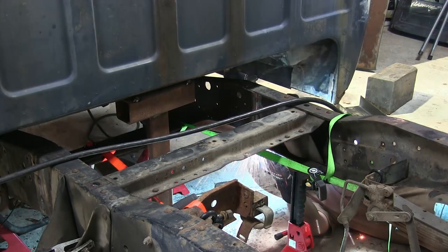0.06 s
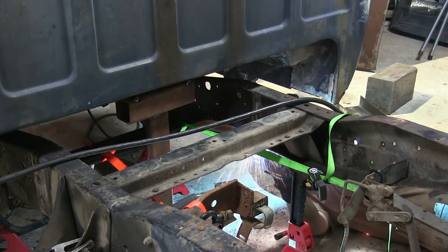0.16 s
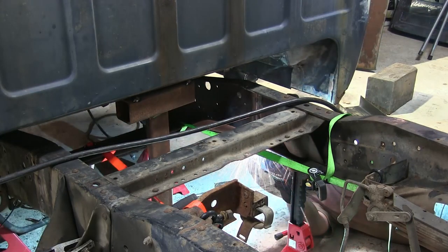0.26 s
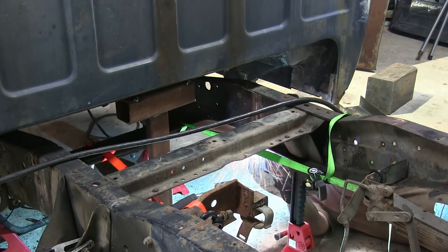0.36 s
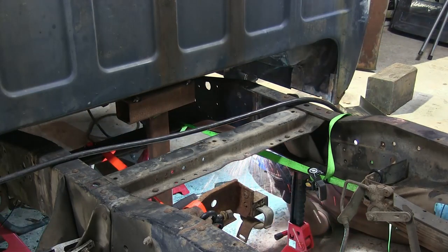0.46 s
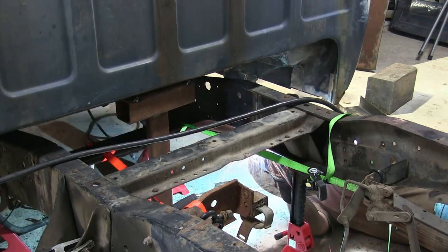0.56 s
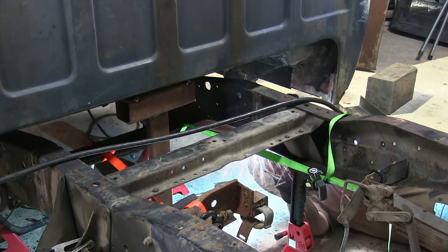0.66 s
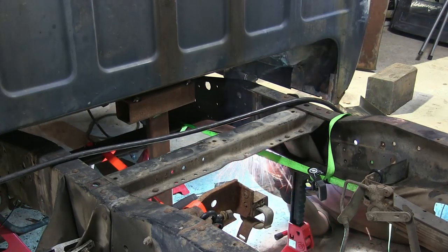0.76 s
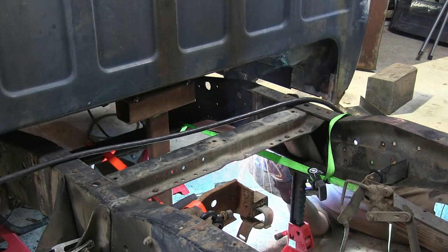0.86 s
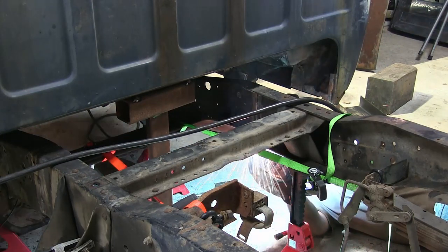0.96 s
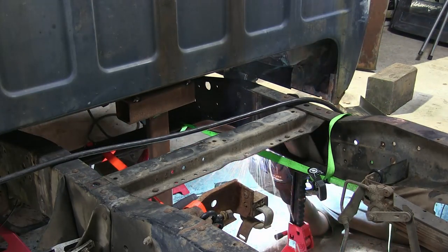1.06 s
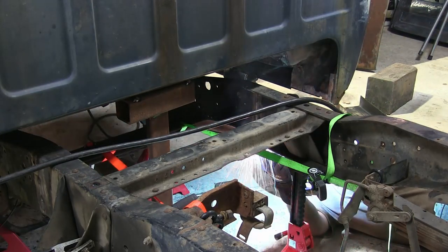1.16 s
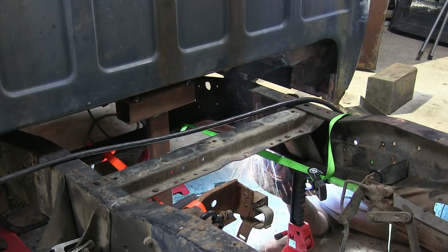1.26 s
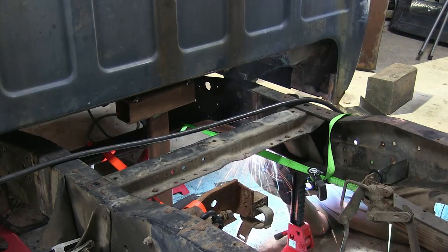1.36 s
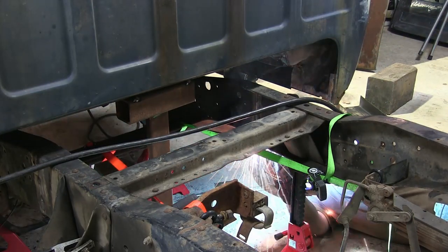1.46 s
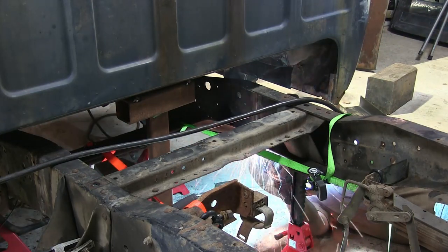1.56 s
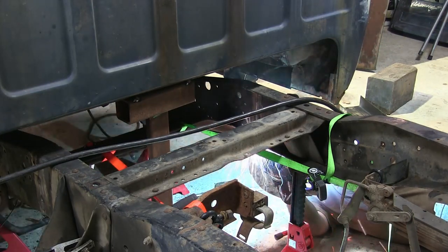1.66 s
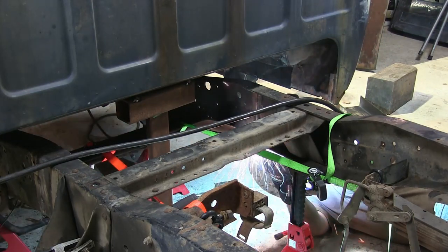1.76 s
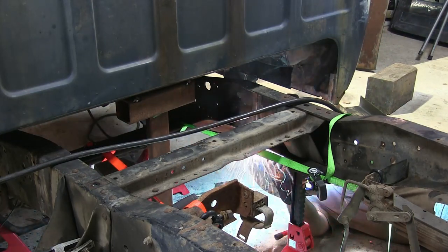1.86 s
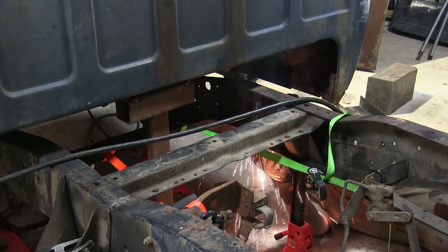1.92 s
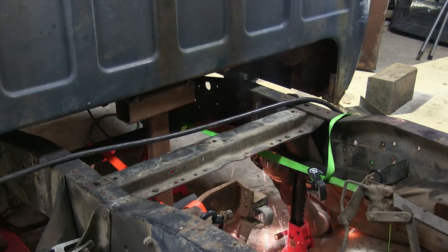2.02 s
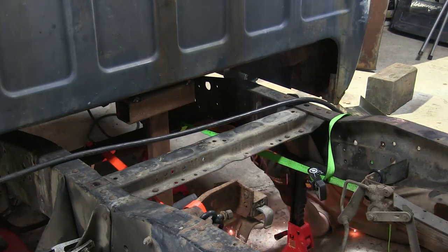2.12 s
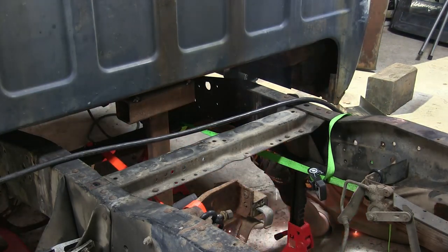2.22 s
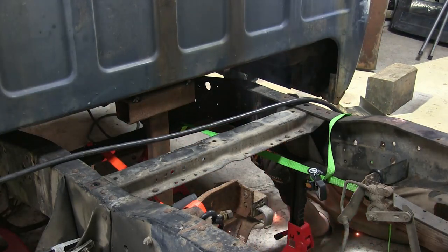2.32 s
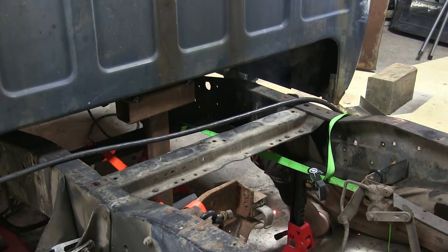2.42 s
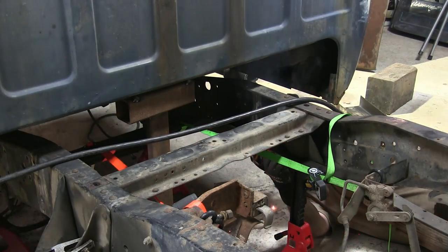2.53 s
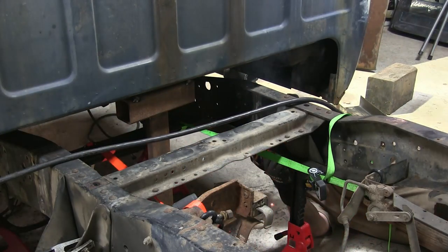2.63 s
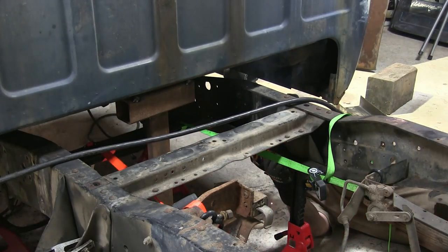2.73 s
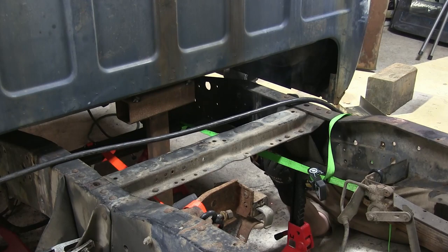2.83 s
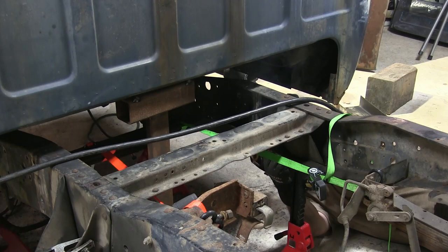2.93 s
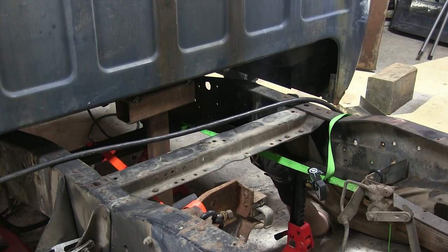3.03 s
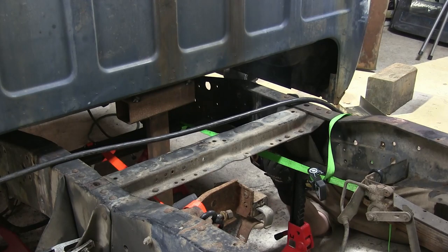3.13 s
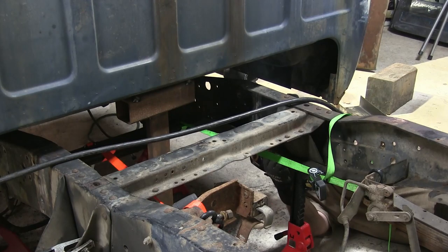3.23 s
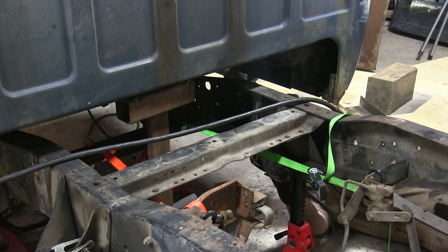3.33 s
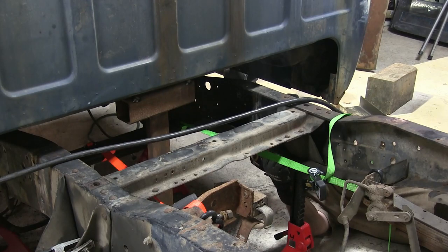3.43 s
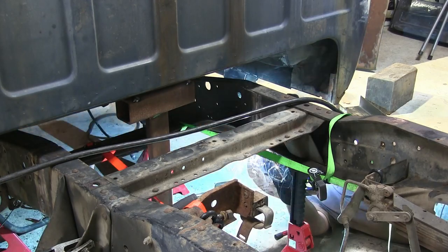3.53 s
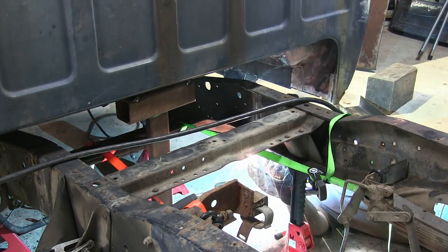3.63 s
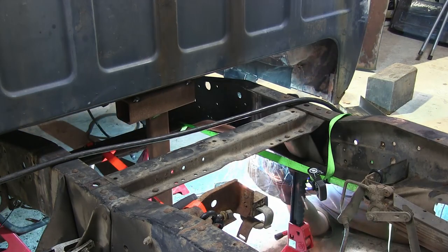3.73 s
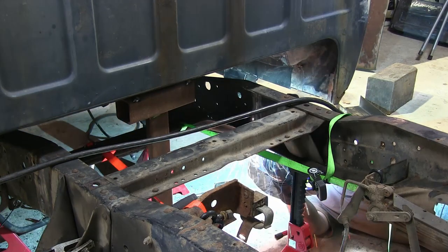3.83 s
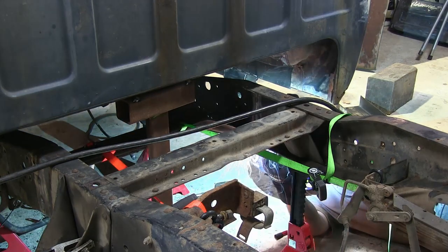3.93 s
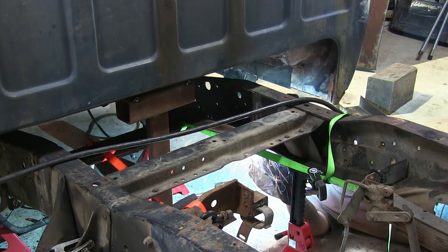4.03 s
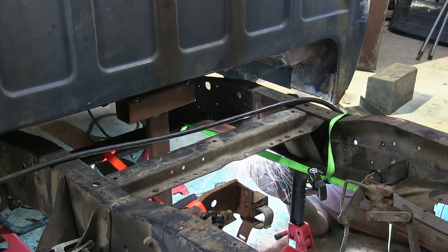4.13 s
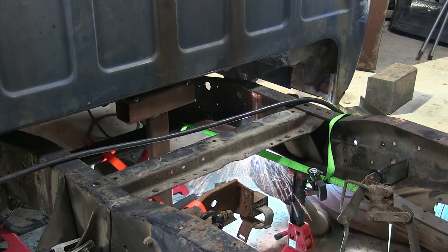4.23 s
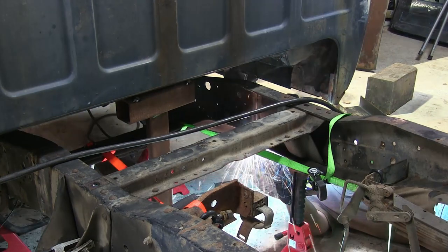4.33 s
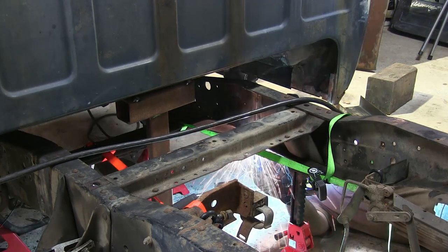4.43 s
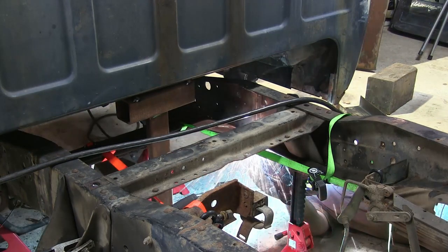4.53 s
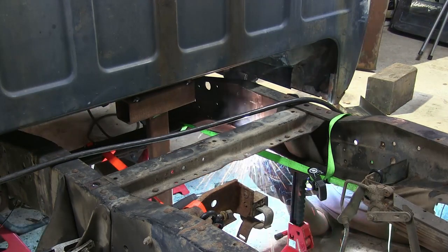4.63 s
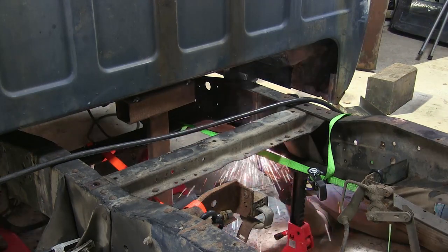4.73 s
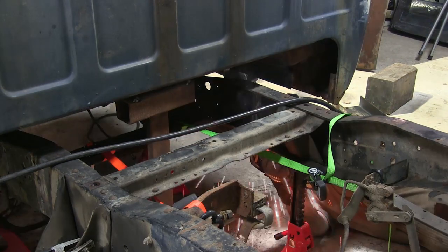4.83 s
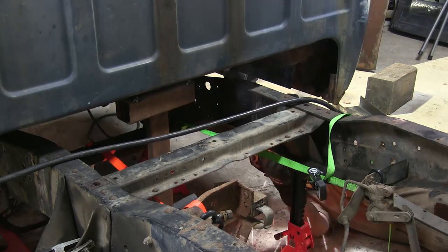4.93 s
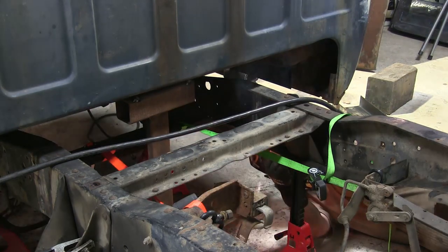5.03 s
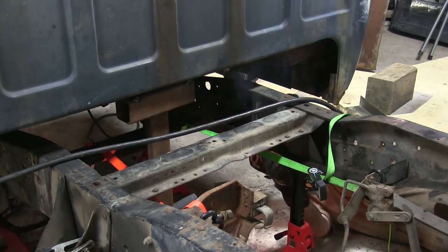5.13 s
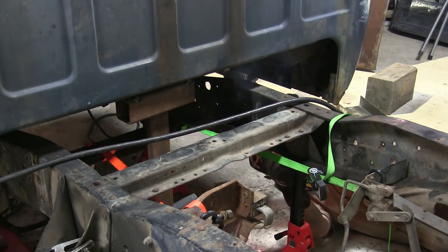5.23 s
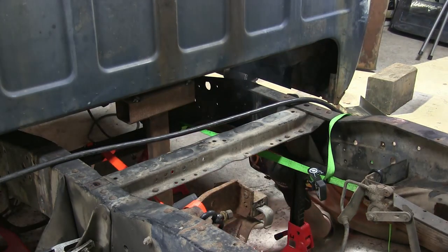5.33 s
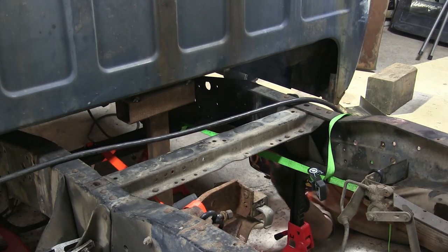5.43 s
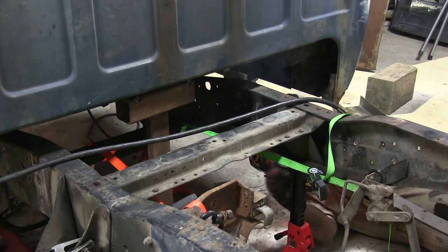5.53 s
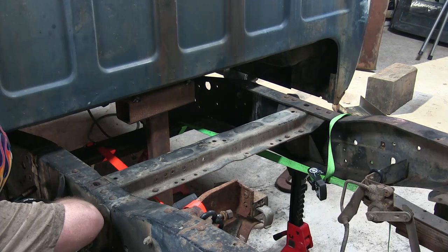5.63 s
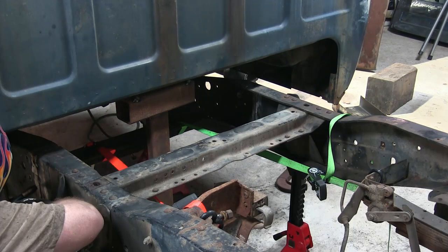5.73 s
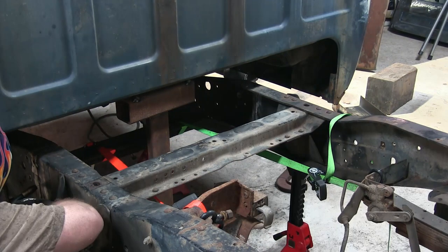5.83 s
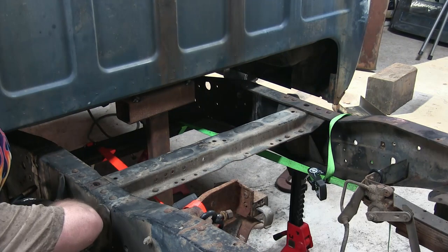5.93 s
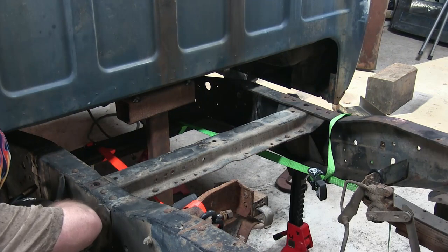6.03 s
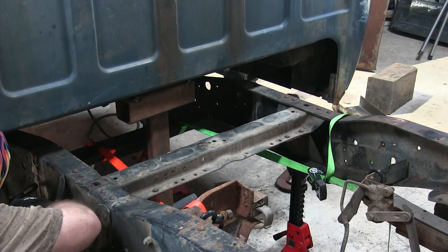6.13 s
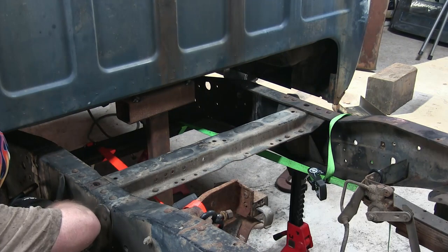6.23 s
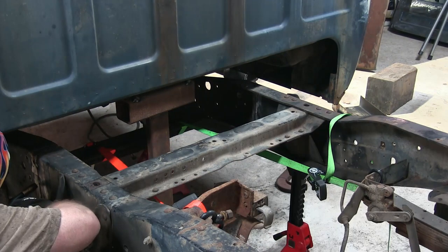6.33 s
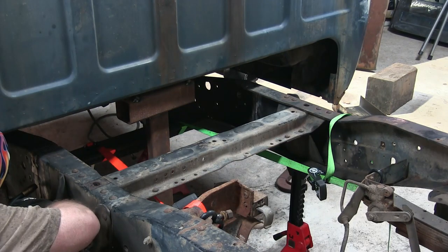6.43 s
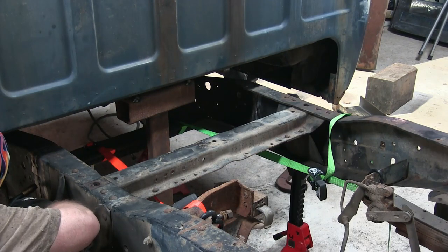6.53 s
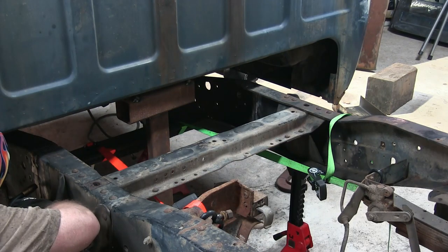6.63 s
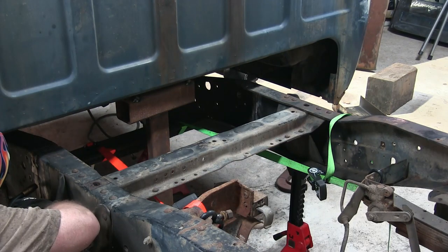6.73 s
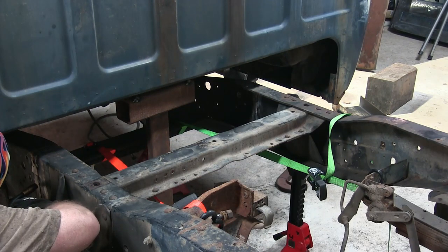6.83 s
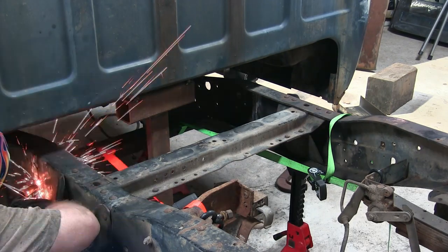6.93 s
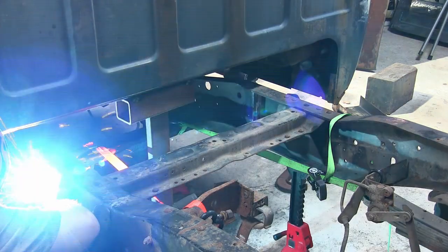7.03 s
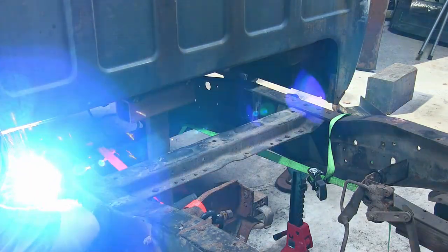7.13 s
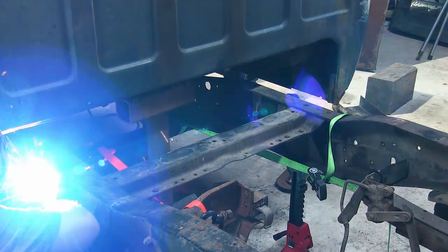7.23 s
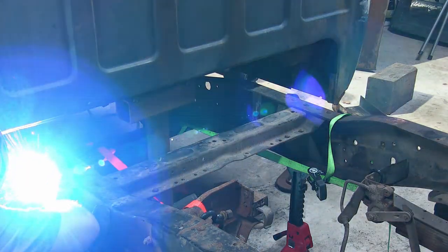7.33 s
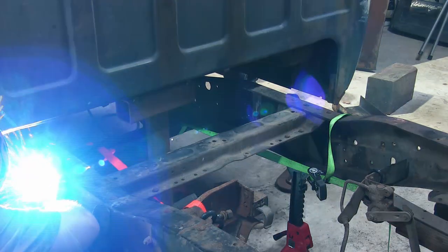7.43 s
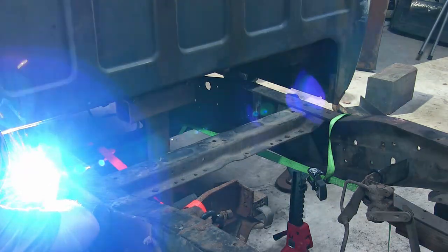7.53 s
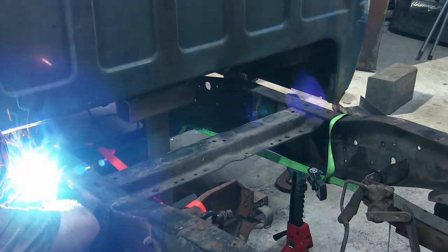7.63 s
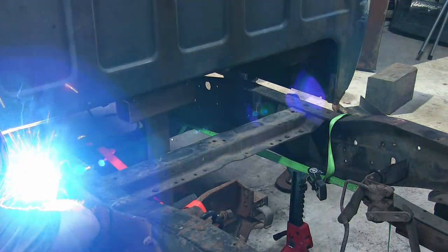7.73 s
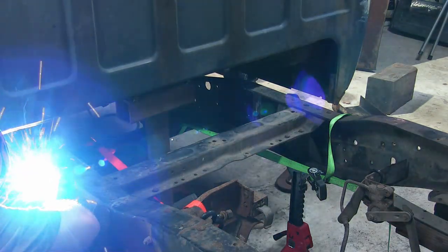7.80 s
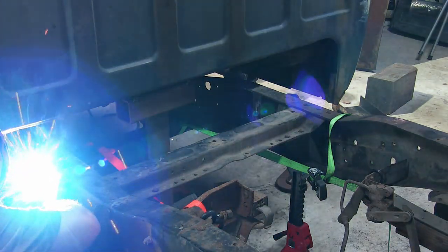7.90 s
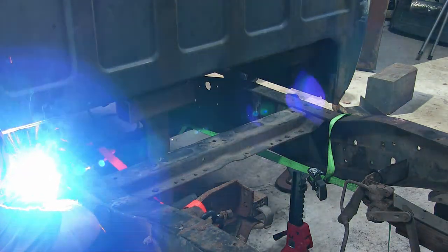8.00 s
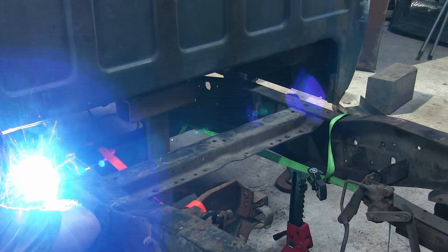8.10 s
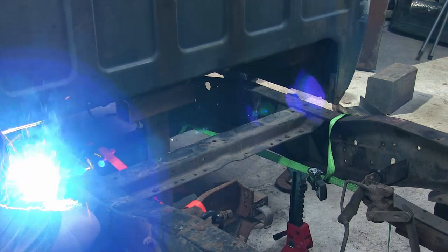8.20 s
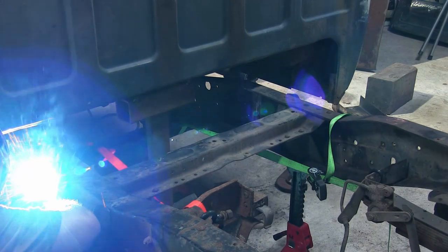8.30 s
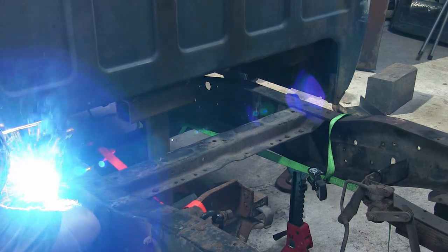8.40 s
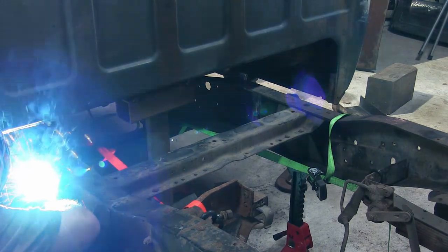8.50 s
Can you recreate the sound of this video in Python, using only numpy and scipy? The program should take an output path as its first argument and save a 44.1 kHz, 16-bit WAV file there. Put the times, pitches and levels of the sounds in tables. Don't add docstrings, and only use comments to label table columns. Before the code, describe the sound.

A garage with hard reflections, heard by a stationary camera microphone with automatic gain. From the first instant to about 2.0 s, a wire-feed welder under a steel frame crackles: rapid, irregular sharp pops, about dozens a second, over bright sizzling fizz, flaring and faltering, with metallic ring and brief faint whistles. It cuts off into a short room tail, and a low fan hum near 210 Hz with soft rushing air swells back. At 3.56 s a tiny tick and touch, then a hard snap at 3.6 s starts a second sputtering run to 4.84 s. Hum recovers; at 5.63 s it abruptly jumps louder after a momentary dip. At 6.92 s a tick and a wire snap, then at 6.98 s a nearer third run catches, stutters and burns with dense, tighter crackling until the end at about 8.6 s, the hum pushed far down beneath it.

```python
import sys
import numpy as np
from scipy import signal
from scipy.fft import rfft, irfft, next_fast_len
from scipy.io import wavfile
from scipy.ndimage import uniform_filter1d, map_coordinates

SR = 44100
rng = np.random.default_rng(int(sys.argv[2]) if len(sys.argv) > 2 else 0)


def master_out(mix):
    frames = np.transpose(np.atleast_2d(mix))
    ceiling = np.clip(frames, -1, 1)
    pcm = np.round(ceiling * 32767).astype(np.int16)
    wavfile.write(sys.argv[1], SR, pcm)


def boost_factor(decibels):
    exponent = np.asarray(decibels, float) / 20
    return 10 ** exponent


N = 377496
T = np.arange(N) / SR
MOVED_S = 5.632

# time in seconds, camera gain in dB (the fan tone's level),
# level of the arc's body in dB.
ARC_RUNS = [
    [(0.0, -46.5, -10.5), (0.27, -54.5, -4), (0.43, -49.5, -11), (0.55, -52, -7), (0.85, -47, -10.5),
     (1.17, -55, -28), (1.35, -52.5, -13.5), (1.75, -49, -14.5), (1.99, -50, -17)],
    [(3.592, -45, -41), (3.68, -52, -8), (3.85, -49.5, -9.5), (4.15, -52, -4.5), (4.4, -52, -8.5),
     (4.49, -53, -9.5), (4.62, -49, -18.5), (4.76, -50, -15), (4.84, -51, -17)],
    [(6.984, -47.5, -18), (7.07, -57.5, -50), (7.13, -59, -15), (7.4, -54, -11.5), (7.7, -57, -13),
     (7.88, -58, -13), (8.07, -61.5, -2.5), (8.3, -62, -6), (8.56, -56, -7)],
]
RUN_POWER_DB = [15.5, 14.5, 19.5]
# start in seconds, level change in dB, fall time in seconds.
FLARES = [(0, 0, 0.028), (0.143, 5, 0.066), (0.377, 2, 0.081), (0.603, 0.5, 0.043), (0.886, 3.5, 0.052),
          (1.056, 6, 0.026), (1.153, 1, .04), (1.228, 10, 0.035), (1.794, -2, 0.038), (1.94, 4, 0.014),
          (4.429, 12, 0.024), (4.815, -0.5, .05), (7.107, 13, 0.015), (7.183, 6, 0.017), (7.82, 5, 0.12)]
# start in seconds, level change in dB, fall time in seconds.
CATCHING = [
    (3.592, 7, .016),
    (3.612, -12, .03),
    (3.645, 11, .028),
    (3.69, -3, .03),
    (6.984, -10, .11),
    (6.985, 8, .018),
    (7.015, -4, .03),
    (7.05, 2, .04),
]
FLARE_RISE_S = .005
# start in seconds, length in seconds, level in dB,
# time in seconds at which the camera gain falls, gain it falls to in dB.
TOUCHES = [
    (3.568, .018, -45, 3.573, -45),
    (6.928, .026, -41.5, 6.955, -39.5),
]
TOUCH_BODY_DB = 5.5

# time in seconds, peak in dB.
FIRST_POPS = [(0.0188, -24), (0.062, -22), (0.1032, -25), (0.1372, -24), (0.1478, -22), (0.1785, -25),
              (0.2038, -25), (0.2871, -25), (0.3561, -22), (0.3707, -25), (0.3836, -22), (0.3948, -24),
              (0.4131, -23), (0.4391, -23), (0.5628, -25), (0.6047, -24), (0.618, -23), (0.6402, -22),
              (0.6801, -24), (0.7051, -22), (0.7514, -23), (0.7644, -23), (0.829, -24), (0.8891, -23),
              (0.8995, -24), (0.9185, -23), (0.9324, -22), (0.947, -22), (0.9589, -25), (0.9717, -23),
              (0.9872, -23), (1.0351, -25), (1.0561, -21), (1.0789, -25), (1.1059, -26), (1.1324, -27),
              (1.1454, -27), (1.232, -22), (1.2485, -22), (1.4111, -25), (1.433, -25), (1.4985, -26),
              (1.5455, -25), (1.5622, -26), (1.6704, -21), (1.7148, -22), (1.7219, -22), (1.7313, -23),
              (1.7384, -24), (1.7463, -23), (1.756, -23), (1.7632, -24), (1.7929, -25), (1.7971, -23),
              (1.8061, -23), (1.8239, -21), (1.8334, -23), (1.9047, -25), (1.9554, -25), (1.9649, -22)]
# time in seconds, peak in dB.
SECOND_POPS = [(3.5942, -20), (3.6466, -20), (3.6755, -26), (3.7314, -27), (3.7648, -26), (3.814, -22),
               (3.8332, -25), (3.8564, -27), (3.8843, -26), (3.9171, -25), (3.9319, -25), (3.9477, -24),
               (3.9565, -26), (3.9665, -25), (3.983, -24), (4.022, -25), (4.0316, -26), (4.0889, -24),
               (4.1729, -26), (4.1944, -24), (4.2096, -25), (4.2314, -24), (4.2401, -26), (4.2625, -24),
               (4.2889, -27), (4.3152, -26), (4.3285, -24), (4.3465, -25), (4.3522, -23), (4.3782, -21),
               (4.4302, -21), (4.5287, -25), (4.5392, -27), (4.5646, -27), (4.5964, -25), (4.63, -24),
               (4.6415, -26), (4.6894, -25), (4.6981, -26), (4.7024, -24), (4.7228, -23), (4.7417, -23),
               (4.7628, -25), (4.7713, -27), (4.7955, -25)]
# time in seconds, peak in dB.
THIRD_POPS = [(6.9858, -22), (7.0465, -24), (7.0671, -25), (7.0908, -25), (7.0996, -25), (7.1412, -26),
              (7.1522, -23), (7.16, -27), (7.2008, -28), (7.2093, -27), (7.2497, -25), (7.278, -27),
              (7.2995, -27), (7.334, -26), (7.3946, -26), (7.4094, -27), (7.4199, -27), (7.4314, -24),
              (7.4528, -27), (7.5086, -26), (7.5824, -25), (7.5907, -27), (7.6, -29), (7.6154, -25),
              (7.6254, -26), (7.6523, -25), (7.7108, -25), (7.7461, -29), (7.7938, -27), (7.8051, -26),
              (7.8281, -28), (7.8352, -29), (7.8591, -26), (7.8707, -26), (7.918, -25), (7.9544, -29),
              (8.0167, -26), (8.0355, -27), (8.1032, -29), (8.1437, -29), (8.1593, -28), (8.1674, -29),
              (8.1842, -29), (8.1927, -28), (8.2035, -27), (8.2178, -26), (8.2324, -27), (8.2801, -28),
              (8.2883, -29), (8.2967, -24), (8.3071, -26), (8.3158, -24), (8.3576, -29), (8.3687, -29),
              (8.4153, -28), (8.4256, -29), (8.4325, -27), (8.4522, -27), (8.4617, -27), (8.5086, -29)]
# time in seconds, peak in dB.
LESSER_FAR_POPS = [(0.0034, -25), (0.0115, -26), (0.0947, -24), (0.2422, -25), (0.3034, -28), (0.3208, -26),
                   (0.4263, -23), (0.4677, -25), (0.581, -23), (0.6463, -22), (0.7162, -25), (0.8005, -23),
                   (0.8162, -26), (0.8766, -22), (0.9776, -25), (1.0187, -26), (1.0317, -27), (1.0919, -27),
                   (1.1676, -29), (1.2032, -28), (1.3106, -29), (1.326, -31), (1.3547, -29), (1.4225, -26),
                   (1.5256, -27), (1.5585, -26), (1.6293, -24), (1.7885, -24), (1.8928, -27), (3.8229, -25),
                   (3.8924, -26), (3.9399, -25), (4.114, -25), (4.3899, -28), (4.4717, -27), (4.5829, -27),
                   (4.8047, -27), (4.8189, -28)]
# time in seconds, peak in dB.
LESSER_NEAR_POPS = [(7.0587, -25), (7.0632, -26), (7.0951, -29), (7.1768, -28), (7.2371, -28),
                    (7.3748, -29), (7.385, -28), (7.4671, -26), (7.4824, -28), (7.5481, -29), (7.6688, -29),
                    (7.7321, -30), (7.7587, -28), (7.7679, -29), (7.908, -28), (7.9666, -28), (7.9777, -31),
                    (7.9989, -30), (8.0616, -29), (8.0934, -30), (8.1086, -29), (8.1242, -30),
                    (8.2094, -28), (8.228, -29), (8.2467, -29), (8.2611, -30), (8.2698, -30), (8.3025, -27),
                    (8.3872, -28), (8.4014, -30), (8.4848, -30), (8.4973, -28), (8.5147, -29)]
# time in seconds, peak in dB.
STRIKES = [
    (3.5708, -26),
    (3.5942, -18.5),
    (3.6466, -18.5),
    (4.4302, -19.5),
    (6.9305, -20),
    (6.9461, -28),
    (6.983, -27),
    (6.9858, -20),
]
SHORTS_PER_S = 400
SHORTS_SHARE = (.21, .25)
POP_TRIM_DB = (-2.5, .5)
POP_BODY_DB, POP_TOP_DB = 11.5, 9
POP_GAP_S, POP_WAIT_S = .007, .016
POP_OVER_DB, POP_SPREAD_DB, POP_CAP = 8, 7.5, -.8
# centre in Hz, width in Hz, level in dB.
FAR_POP_RING = [(4720, 800, 5.5), (7750, 600, 2), (11300, 900, 3), (14500, 800, 12)]
# centre in Hz, width in Hz, level in dB.
NEAR_POP_RING = [(1700, 500, 2), (2400, 700, -1), (6500, 1500, -6)]

# time in seconds, level in dB, pitch in Hz.
TRIGGER_TICKS = [
    (3.5578, -28, 7740),
    (6.9166, -26, 7750),
]
# start in seconds, length in seconds, pitch in Hz, level in dB.
WHISTLES = [(.07, .07, 2540, -54), (.14, .05, 2570, -57), (.2, .1, 2515, -53), (.36, .05, 2520, -60),
            (.57, .06, 2500, -58), (.89, .08, 2525, -52), (1.565, .13, 2505, -54), (1.67, .11, 2515, -52),
            (3.8, .06, 2520, -52), (3.9, .08, 2510, -58), (4.06, .05, 2500, -57), (4.51, .05, 2500, -61),
            (4.65, .065, 2520, -54), (4.71, .14, 2520, -60), (7.05, .06, 1580, -60), (7.3, .22, 1590, -59),
            (7.55, .09, 1580, -57), (7.85, .07, 1575, -57), (8.02, .11, 1590, -58), (8.28, .08, 1580, -60),
            (8.18, .06, 1590, -60), (7.88, .09, 797, -59), (8.0, .14, 797, -57), (8.27, .05, 797, -63),
            (8.46, .06, 797, -60)]

# frequency in Hz, density in dB per Hz.
FAR_COLOUR = [(140, -35), (230, 3.5), (243, -3.5), (586, 2.5), (1010, 0), (1630, 2), (1810, 0), (2530, 1.5),
              (2870, 0.5), (4700, 2), (8410, 7), (11400, 6), (15600, 0.5)]
# frequency in Hz, density in dB per Hz.
NEAR_COLOUR = [(140, -40), (230, -1), (256, -6.5), (358, -4), (509, -4), (640, -3.5), (687, -5),
               (791, -0.5), (1190, -6.5), (1600, -7.5), (3940, -3), (7050, 2), (15600, -3.5)]
# frequency in Hz, density in dB per Hz.
FAR_RUMBLE = [(20, -80), (60, -31.5), (120, -12)]
# frequency in Hz, density in dB per Hz.
NEAR_RUMBLE = [(20, -71), (60, -39), (120, -21)]
# centre in Hz, width in Hz, level in dB.
FAR_STEEL = [(2540, 130, -2), (3110, 110, 1), (3640, 90, 1), (4150, 130, -6), (4900, 400, -6),
             (6200, 1140, -6), (9400, 200, -17)]
# centre in Hz, width in Hz, level in dB.
NEAR_STEEL = [(790, 40, 0), (1590, 80, 8), (2350, 120, 5), (4700, 170, -8), (6900, 180, -11)]
# delay in seconds, level in dB, pan.
FAR_WALLS = [(-.002, -8, -.1), (0, 0, .05), (.0027, -15, .4), (.0056, -13, -.5), (.00595, -11, .3),
             (.0098, -15, .6), (.013, -9, -.1), (.01322, -10, .2), (.0148, -12, -.5), (.0161, -14, .4)]
# delay in seconds, level in dB, pan.
NEAR_WALLS = [(0, 0, .2), (.0016, -17, .3), (.0028, -10, .4), (.006, -14, .3), (.0127, -11, -.4),
              (.01288, -10, .1), (.0131, -12, .2), (.0135, -13, -.3), (.0143, -13, .4), (.0164, -15, -.5)]
# frequency in Hz, time to fall 60 dB in seconds.
GARAGE_DECAY = [(200, 0.81), (2000, 0.75), (6000, 0.66), (10000, 0.49), (15000, 0.31)]
NOTCH_HZ, NOTCH_WIDTH_HZ, NOTCH_DEPTH = 8420, 610, 0.42
RING_SWELL_DB = 3.5
TRAVEL = .005

# frequency in Hz, density in dB per Hz.
FAN_AIR = [(15, -56), (25, -36), (64, -54.5), (169, -21.5), (209, 12), (227, -29.5), (246, -23.5),
           (421, -25), (457, -28.5), (648, -22.5), (871, -30), (1380, -30.5), (1900, -38), (5880, -52),
           (9500, -61.5), (15500, -75)]
# frequency in Hz, left-right likeness.
FAN_ALIKE = [(60, 0.83), (240, 1), (950, 0.62), (3770, 0.52), (15000, 0.8)]
BLADE_HZ, SAG_HZ = 210.2, 2.2

# start in seconds, gain change in dB, fall time in seconds.
DUCKS = [
    (3.578, -6, .035),
    (3.655, -4, .04),
    (6.978, -14, .038),
    (7.018, 6, .04),
    (7.07, 3, .02),
    (7.095, -9, .025),
]
REST_DB, RECOVER_S, CREEP_DB_PER_S = -40.5, 0.15, 1.5
NEW_SHOT_DB, SPLICE_DB = -31, -48
TOP_HZ, EDGE_HZ = 15790, 25


def unit(x):
    return x / np.sqrt(np.mean(x ** 2) + 1e-20)


def along(points, hz):
    f, v = np.transpose(points)
    return np.interp(np.log(hz + 1), np.log(f + 1), v)


def curves(*tables):
    s, *cols = np.vstack(tables).T
    return [np.interp(T, s, c) for c in cols]


def during(start, end):
    return (T >= start) & (T < end)


def wobble(rate):
    return map_coordinates(rng.standard_normal(int(N * rate / SR) + 4), [T * rate])


def filtered(x, response):
    m = 2 * next_fast_len(N // 2 + SR)
    return irfft(rfft(x, m) * response(np.fft.rfftfreq(m, 1 / SR)), m)[..., :N]


def causal(gain):
    cep = irfft(np.log(gain + 1e-6))
    cep[1:len(cep) // 2] *= 2
    cep[len(cep) // 2 + 1:] = 0
    return np.exp(rfft(cep))


def rings(modes, f):
    return sum(boost_factor(db) * 1j * f * w / (c * c - f * f + 1j * f * w) for c, w, db in modes)


def flares(rows):
    s, db, lasts = np.transpose(rows)[..., None]
    grid = np.arange(0, T[-1], .001)
    t = np.maximum(grid - s, 0)
    shapes = db * (1 - np.exp(-t / FLARE_RISE_S)) * np.exp(-(t / lasts) ** 2)
    return np.interp(T, grid, shapes.sum(0))


def arc_burning():
    return 1. * sum(during(run[0][0], run[-1][0]) for run in ARC_RUNS)


def camera_gain():
    db = curves(*ARC_RUNS)[0]
    for run, after in zip(ARC_RUNS, ARC_RUNS[1:]):
        end, end_db = run[-1][:2]
        t = np.maximum(T - end, 0)
        climb = REST_DB + CREEP_DB_PER_S * t + (end_db - REST_DB) * np.exp(-t / RECOVER_S)
        db = np.where(during(end, after[0][0]), climb, db)
    db = np.where(during(MOVED_S, ARC_RUNS[-1][0][0]), NEW_SHOT_DB, db)
    db = np.where(during(MOVED_S - .004, MOVED_S), SPLICE_DB, db)
    for (*_, falls, to_db), run in zip(TOUCHES, ARC_RUNS[1:]):
        db = np.where(during(falls, run[0][0]), to_db, db)
    return boost_factor(uniform_filter1d(db + flares(DUCKS), size=100))


def fan():
    load = uniform_filter1d(arc_burning(), size=4000)
    turn = 2 * np.pi * np.cumsum(BLADE_HZ - SAG_HZ * load + .5 * wobble(13)) / SR
    tone = np.sqrt(2) * boost_factor(0.5 * wobble(20) + 0.091 * wobble(90)) * np.sin(turn) * boost_factor([[-.8], [.8]])
    octave = boost_factor(-20.0 + 0.67 * wobble(15)) * np.sin(2 * turn + 0.31 * wobble(11))

    def air(hz):
        half = np.arccos(np.clip(along(FAN_ALIKE, hz), -1, 1)) / 2
        return boost_factor(np.minimum(along(FAN_AIR, hz), -20)) * [np.cos(half), np.sin(half)]

    mid, side = filtered(rng.standard_normal((2, N)), air)
    gusts = boost_factor(-9.5 + 0.75 * wobble(4.09) + 0.38 * wobble(28))
    rush = unit(np.array([mid + side, mid - side]))
    return tone + octave + gusts * boost_factor([[.6], [-.6]]) * rush


def garage(x, shared):
    hz, t, z = signal.stft(rng.standard_normal((2, 3, SR * 3 // 4)), SR, nperseg=256)
    z = z[:, :2] + z[:, 2:] * (shared * (1 + 300 / (hz + 100)))[:, None]
    decay = boost_factor(-60 * t / along(GARAGE_DECAY, hz)[:, None])
    tails = signal.istft(z * decay, SR, nperseg=256)[1]
    tails = tails / np.linalg.norm(tails[0, 0])
    turn = 2 * np.pi * 1.7 * T
    parts = x * np.array([np.cos(turn), np.sin(turn)])
    return signal.oaconvolve(parts[:, None], tails, axes=2).sum(0)[:, :N]


def path(x, colour, steel, walls, snap_hz, damping, room_db, shared):
    def responses(f):
        snap = -f * f / (snap_hz ** 2 - f * f + 1j * f * snap_hz * damping)
        shadow = 1 - NOTCH_DEPTH * np.exp(-((f - NOTCH_HZ) / NOTCH_WIDTH_HZ) ** 2)
        return causal(boost_factor(along(colour, f)) * shadow) * [f ** 0, snap, rings(steel, f) * snap]

    bare, spike, ring = filtered(x, responses)
    rung = spike + boost_factor(RING_SWELL_DB * (wobble(6.7) + 0.1)) * ring
    now = np.arange(N)
    stretch = SR * (1 + TRAVEL * wobble(1.5))
    early = np.zeros((2, N))
    for s, db, pan in walls:
        arrival = rung[(now - (s * stretch).astype(int)) % N]
        early += boost_factor(db) * np.outer([1 + pan, 1 - pan], arrival)
    return early + boost_factor(room_db) * garage(bare, shared)


def torch_ticks():
    out, t = np.zeros(N), np.arange(600) / SR
    for s, db, hz in TRIGGER_TICKS:
        swell = boost_factor(db - 12 - 60 * t / 0.015) * (1 - np.exp(-t / 0.0011))
        grit = .5 * np.diff(rng.standard_normal(601))
        out[round(s * SR):][:600] += swell * (np.sin(2 * np.pi * hz * t) + grit)
    return out


def arc_whistles():
    out = np.zeros(N)
    flutter = boost_factor(5.5 + 1.5 * wobble(60))
    drift = np.cumsum(5 * wobble(30)) / SR
    for s, length, hz, db in WHISTLES:
        on = slice(round(s * SR), round((s + length) * SR))
        swell = np.minimum(2 * np.sin(np.pi * (T[on] - s) / length), 1)
        out[on] += swell * flutter[on] * boost_factor(db) * np.sin(2 * np.pi * (hz * T[on] + drift[on]))
    return out


def ordinary_pops(level_db, burning):
    waits, sizes = rng.standard_exponential(600), rng.standard_normal(600)
    s = np.cumsum(POP_GAP_S + POP_WAIT_S * waits)
    at = np.minimum(s * SR, N - 1).astype(int)
    db = level_db[at] + POP_OVER_DB + POP_SPREAD_DB * np.minimum(sizes, POP_CAP)
    return np.transpose([s, db])[(burning[at] > 0) & (s < T[-1])]


def fizz_and_shorts():
    struck = rng.random(N) < SHORTS_PER_S / SR
    sizes = rng.standard_normal(N) + .4 * rng.standard_normal((2, N))
    shorts = struck * boost_factor(3.8 * np.minimum(sizes, 1.3))
    fizz = rng.standard_normal(N) * boost_factor(2.0 * rng.standard_normal(N) + 2.94 * wobble(160))
    return .17 * unit(fizz) - np.where(T < MOVED_S, *SHORTS_SHARE) * unit(shorts)


def bridge_pops(usual):
    rows = [FIRST_POPS, SECOND_POPS, THIRD_POPS, LESSER_FAR_POPS, LESSER_NEAR_POPS, STRIKES, usual]
    s, db = np.vstack(rows).T
    luck = rng.standard_normal((700, 2))[:len(s)].T
    pops = np.zeros((2, N))
    pops[:, np.round(s * SR).astype(int)] = boost_factor(db + [[POP_BODY_DB], [POP_TOP_DB]] + 0.81 * luck)
    out = np.zeros((2, N))
    places = (T < MOVED_S, T >= MOVED_S)
    for here, modes, trim_db in zip(places, (FAR_POP_RING, NEAR_POP_RING), POP_TRIM_DB):
        out += boost_factor(trim_db) * filtered(pops * here, lambda hz: (1 + rings(modes, hz)) / (1 + 1j * hz / 6400) ** 2)
    return out


def arc(lift):
    steady_db, body_db = curves(*ARC_RUNS)
    burning = arc_burning()
    for db, run in zip(RUN_POWER_DB, ARC_RUNS):
        steady_db = steady_db + db * during(run[0][0], run[-1][0])
    level_db = steady_db + flares(FLARES + CATCHING)
    usual = ordinary_pops(level_db, burning)
    for start, length, db, *_ in TOUCHES:
        on = during(start, start + length)
        burning = burning + on
        level_db = np.where(on, db, level_db)
        steady_db = np.where(on, db, steady_db)
        body_db = np.where(on, TOUCH_BODY_DB, body_db)
    crackle = fizz_and_shorts() * burning
    body_level_db = steady_db + body_db + 15.0 + 0.19 * wobble(25)
    top_level_db = level_db + 0.23 + 0.39 * wobble(30)
    both = crackle * boost_factor(np.array([body_level_db, top_level_db])) - bridge_pops(usual)

    def body_and_top(hz):
        low = 1 / (1 + 1j * hz / 2500)
        return np.array([low, 1 - low])

    return filtered(both * lift, body_and_top).sum(0)


def scene():
    lift = 1 / camera_gain()
    torch = arc(lift)
    far_colour = FAR_RUMBLE + FAR_COLOUR[1:]
    near_colour = NEAR_RUMBLE + NEAR_COLOUR[1:]
    far = path(torch * (T < MOVED_S), far_colour, FAR_STEEL, FAR_WALLS,
               snap_hz=1280, damping=1.6, room_db=3.0, shared=1.0)
    near = path(torch * (T >= MOVED_S), near_colour, NEAR_STEEL, NEAR_WALLS,
                snap_hz=1130.0, damping=1.86, room_db=1.5, shared=1.0)
    far[:, -SR // 10:] = near[:, :SR // 10] = 0
    return boost_factor(-1) * far + boost_factor(3) * near + fan() + (torch_ticks() + arc_whistles()) * lift


def roll_off(x):
    return signal.sosfilt(signal.butter(12, 16660, fs=SR, output="sos"), x)


def record(dry):
    x = dry * camera_gain()
    x = x / (1 + np.abs(x / .12) ** 4) ** (1 / 4)

    def band(hz):
        top = 1 / (1 + np.exp(np.minimum((hz - TOP_HZ) / EDGE_HZ, 50)))
        return top * hz ** 2 / (hz ** 2 + 55 ** 2)

    return roll_off(filtered(x, band))


dry = scene()
out = record(dry)
master_out(out)
```